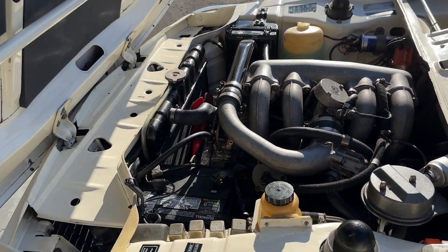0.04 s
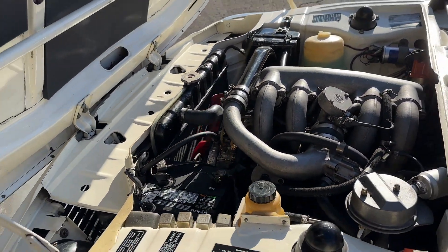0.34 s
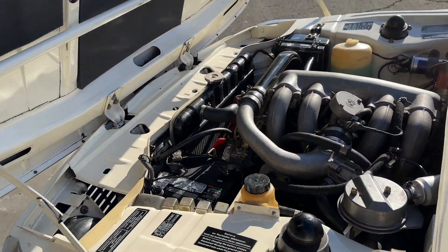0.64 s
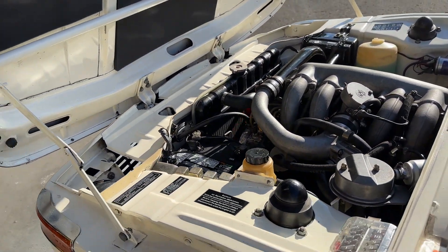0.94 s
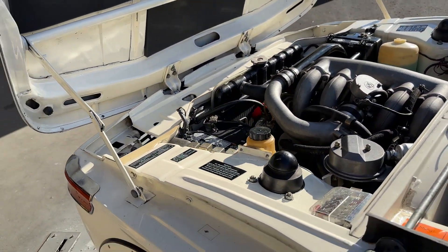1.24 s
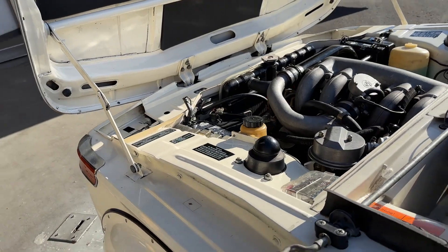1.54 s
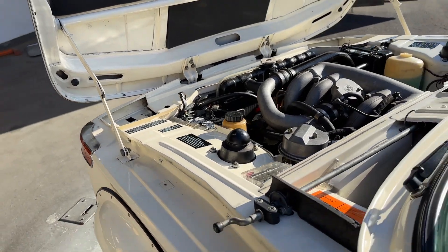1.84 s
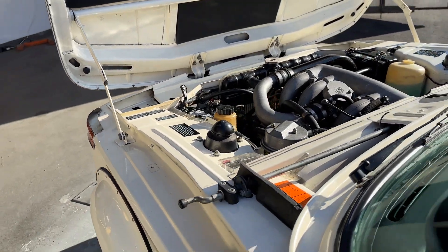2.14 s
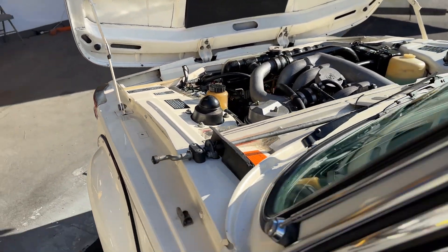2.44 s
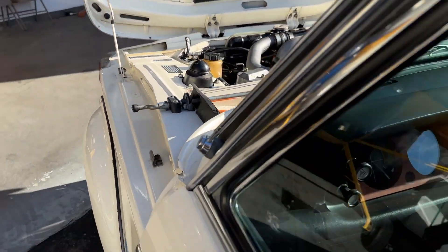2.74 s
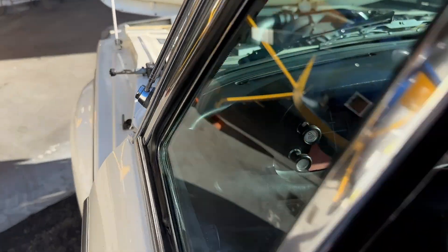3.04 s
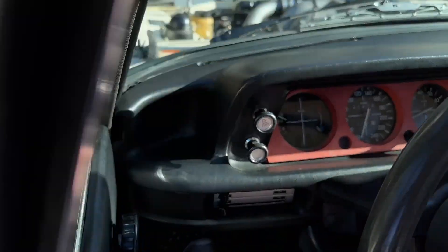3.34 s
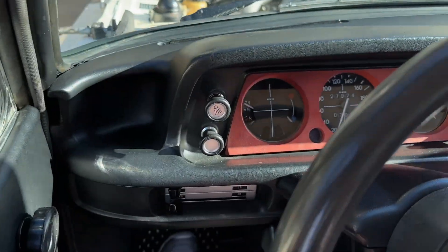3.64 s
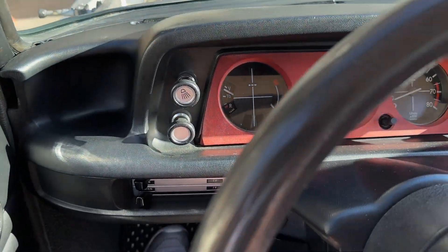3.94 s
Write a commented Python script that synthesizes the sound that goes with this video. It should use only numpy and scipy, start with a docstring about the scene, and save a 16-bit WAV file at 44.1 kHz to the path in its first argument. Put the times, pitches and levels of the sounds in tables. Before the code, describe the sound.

A vintage petrol engine idling with clatter and hiss, turning to a dull boom in the cabin.

```python
"""An old four-cylinder petrol engine idles fast with its bonnet open, its speed wandering a little.
Its firings make the exhaust boom and lope (beat unevenly) and the engine block thrum.
Valves and chain clatter and set metal parts ringing; the fan rushes, the intake hisses, the belt whines.
There is one soft knock and a few faint squeaks. The listener walks from the engine bay into the cabin,
where most of the treble is shut out, a thin sizzle is heard and the boom stays."""
import sys
import numpy as np
from scipy import signal
from scipy.fft import rfft, irfft
from scipy.io import wavfile
from scipy.ndimage import uniform_filter1d, map_coordinates

SR = 44100
rng = np.random.default_rng(int(sys.argv[2]) if len(sys.argv) > 2 else 0)


def transcribe(u):
    """Save the signal u as a 16-bit wav file named by the first command-line argument.

    u: samples, shape (n,) or (channels, n), limited to [-1, 1]; the rate is SR.
    q: integer samples, one column per channel.
    """
    v = np.clip(np.atleast_2d(u).T, -1, 1)
    q = np.round(v * 32767).astype(np.int16)
    wavfile.write(sys.argv[1], SR, q)


N = 176400
TIME_S = np.arange(N) / SR

# How fast the crankshaft spins: time_s, turns_per_s
CRANK_SPEED = [(0.0, 29.4), (0.41, 29.4), (0.52, 30.0), (0.65, 29.8), (0.85, 30.5), (1.0, 30.0),
               (1.31, 31.0), (1.95, 29.3), (2.04, 30.2), (2.17, 30.5), (2.25, 30.2), (2.87, 30.1),
               (3.27, 30.4), (3.49, 29.8), (3.7, 28.8), (4.0, 29.12)]
# The engine bay as heard along the walk: time_s, clatter_db, rush_db, hiss_db, left_minus_right_db
BAY_LEVELS = [(0.0, -32, -36.5, -30.5, 2), (0.57, -31.5, -36.5, -29.5, 2), (1.47, -33.5, -40, -33.5, 1.5),
              (1.77, -34.5, -39.5, -33.5, 2), (2.49, -35.5, -40.5, -34.5, 2),
              (2.63, -36.5, -42.5, -35, 3.5), (2.85, -37, -43.5, -37, 3.5), (3.12, -40.5, -46.5, -41, 9),
              (3.24, -41.5, -47.5, -44.5, 11.5), (3.53, -50, -57, -58.5, 11.5), (3.95, -53.5, -61, -61, 11),
              (4.0, -50, -58, -62, 7)]


def undb(db):
    """Turn decibels into a gain to multiply by."""
    return 10 ** (np.asarray(db) / 20)


def unit(x):
    """Scale a sound so that its average power is 1."""
    return x / np.sqrt(np.mean(x ** 2))


def curve(table, column=1):
    """One column of a time table, filled in for every sample."""
    rows = np.array(table, float)
    return np.interp(TIME_S, rows[:, 0], rows[:, column])


def colour(x, spectrum):
    """Shape bass and treble by rows of pitch_hz, level_db."""
    rows = np.array(spectrum, float)
    hz = np.maximum(np.arange(N // 2 + 1) * SR / N, 1)
    level_db = np.interp(np.log(hz), np.log(rows[:, 0]), rows[:, 1])
    return irfft(rfft(x) * undb(level_db), N)


def resonate(x, hz, width_hz, passes=1):
    """Let a sound ring at one pitch; more passes keep less of the others."""
    for _ in range(passes):
        x = signal.lfilter(*signal.iirpeak(hz, hz / width_hz, fs=SR), x)
    return x


def wander(rate_hz):
    """A smooth random wobble, about 1 in size."""
    hold = int(SR / rate_hz)
    steps = np.repeat(rng.standard_normal(N // hold + 1), hold)
    return unit(uniform_filter1d(uniform_filter1d(steps, hold), hold)[:N])


def per_event(count):
    """A new random value at each whole count, with slopes in between."""
    values = rng.standard_normal(2048)
    return np.interp(count, np.arange(len(values)), values)


def spread(mid, side, pan_db):
    """Make left and right from two similar sounds, widest in the treble."""
    # Stereo width: pitch_hz, side_minus_mid_db
    width = [(60, -4), (200, -11.5), (380, -10.5), (700, -6.5), (1300, -5.5), (2400, -3.5), (4400, -1.5),
             (15000, 3)]
    pair = unit(mid) + colour(unit(side), width) * np.array([[1], [-1]])
    gains = undb(np.array([pan_db, -pan_db]) / 2)
    return pair * gains / np.sqrt(np.mean(gains ** 2, axis=0))


def beside(start_s=0.97, walk_s=0.7):
    """The listener's place: 0 over the engine, 1 beside the car."""
    return np.clip((TIME_S - start_s) / walk_s, 0, 1)


def inside(start_s=3.17, fade_s=0.2):
    """The listener's place: 0 outside, 1 in the cabin."""
    return np.clip((TIME_S - start_s) / fade_s, 0, 1)


def panel_echoes(x, strength=.36, longest_s=.006, count=6):
    """Add short echoes off the bodywork; their strengths change as the listener walks."""
    lags = longest_s * SR * rng.uniform(.1, 1, count)
    drifts = rng.uniform(-2, 2, count)
    progress = np.arange(N) / N
    echoes = sum(np.roll(x, int(lag)) * np.cos(drift * progress) for lag, drift in zip(lags, drifts))
    return x + strength / np.sqrt(count) * echoes


def cabin_sizzle(level_db=-54.5):
    """A thin, high noise heard only in the cabin."""
    # Tone of the sizzle: pitch_hz, level_db
    spectrum = [(2000, -9), (3700, -13), (4080, -3.5), (4350, -12), (4900, -9), (5600, -25), (9000, -38)]
    return unit(colour(rng.standard_normal((2, N)), spectrum)) * inside() * undb(level_db)


def squeaks(waver_hz=45):
    """Belt and fittings squeak: shaky high tones that swell and fade."""
    # The squeaks: peak_s, pitch_hz, length_s, level_db
    events = [(1.72, 4020, .16, -53), (2.21, 3305, .2, -50), (3.91, 5080, .03, -63),
              (3.982, 4900, .03, -60)]
    sound = 0
    for peak_s, hz, length_s, db in events:
        phase = 2 * np.pi * np.cumsum(hz + waver_hz * wander(300)) / SR
        swell = np.exp(-(2 * (TIME_S - peak_s) / length_s) ** 2)
        sound += np.sqrt(2) * np.sin(phase) * swell * undb(db)
    return sound


def knock(start_s=.226, decay_s=.018, gain_db=-30):
    """A panel is knocked softly once and rings briefly."""
    # The panel's tones: pitch_hz, relative_db
    tones = [(262, -3), (322, -1), (410, -5), (505, -7)]
    age_s = np.maximum(TIME_S - start_s, 0)
    ring = sum(undb(db) * np.sin(2 * np.pi * hz * age_s) for hz, db in tones)
    return ring * np.exp(-age_s / decay_s) * undb(gain_db)


def belt_whine(pan_db, waver=.008, roughness=.5):
    """The belt drive sings two slightly rough tones that waver together."""
    # The two tones: pitch_hz, gain_db
    tones = [(922, -1.5), (1336, 0.5)]
    # How they swell and fade: time_s, lower_tone_db, upper_tone_db
    levels = [(0.0, -48, -53), (0.25, -53, -52), (0.36, -41, -44), (0.52, -37.5, -46), (0.65, -38.5, -52),
              (0.85, -37.5, -55), (1.05, -42, -50), (1.2, -52, -53), (1.4, -44, -55), (1.52, -48, -58),
              (1.7, -39.5, -47), (1.95, -42, -46), (2.1, -42, -53), (2.3, -49, -52), (2.52, -46, -53),
              (2.72, -39.5, -50), (2.86, -48, -53), (3.08, -44.5, -52), (3.22, -53, -56), (3.4, -55, -60),
              (3.6, -54.5, -69), (3.75, -61, -78), (4.0, -60, -72)]
    wavering_s = np.cumsum(1 + waver * wander(20)) / SR
    sound = 0
    for column, (hz, db) in enumerate(tones, start=1):
        mid, side = (unit(resonate(x, hz, width_hz=60, passes=2)) for x in rng.standard_normal((2, N)))
        tone = np.sqrt(2) * np.sin(2 * np.pi * hz * wavering_s) + roughness * mid
        sound += spread(tone, side, pan_db) * undb(curve(levels, column) + db)
    return sound


def air_noise(spectrum):
    """The noise of moving air, echoed by the bodywork."""
    return unit(panel_echoes(colour(rng.standard_normal(N), spectrum)))


def fan_rush(turns, pan_db, throb=0.1):
    """The fan makes a wide rush of air that throbs twice a crank turn."""
    # Tone of the rush: pitch_hz, level_db
    spectrum = [(1200, -33), (2300, 0), (3000, 0), (4000, 1), (5500, 0.5), (7200, 1), (8300, -6.5),
                (10000, -41), (16000, -23)]
    rush = spread(air_noise(spectrum), air_noise(spectrum), pan_db)
    return rush * (1 + throb * np.cos(4 * np.pi * turns)) * undb(curve(BAY_LEVELS, column=2))


def intake_hiss(turns, throb=0.1, lag_samples=3.8, all_round_share=.14, gain_db=4):
    """The intake hisses from one spot, reaching the left side later, and throbs once a turn."""
    # Tone of the hiss: pitch_hz, level_db
    spectrum = [(4500, -34), (6300, -13), (7600, -4), (9000, -1.5), (10300, 5.5), (11000, 3.5),
                (11800, -0.5), (13200, 0), (14800, 7), (16000, 1.5)]
    right = air_noise(spectrum)
    delay = np.exp(-2j * np.pi * np.arange(N // 2 + 1) / N * lag_samples)
    left = irfft(rfft(right) * delay, N)
    all_round = np.array([air_noise(spectrum), air_noise(spectrum)])
    hiss = np.sqrt(1 - all_round_share) * np.array([left, right]) + np.sqrt(all_round_share) * all_round
    return hiss * (1 + throb * np.cos(2 * np.pi * turns)) * undb(curve(BAY_LEVELS, column=3) + gain_db)


def valve_taps(turns, decay_s, scatter_db):
    """The loudness of valves snapping shut: four uneven, fading taps a turn."""
    count = 4 * turns
    taps_per_s = count[-1] * SR / N
    age_s = (count % 1) / taps_per_s
    return np.exp(-age_s / decay_s) * undb(scatter_db * per_event(np.floor(count)))


def rattle(turns, repeat_share, tap_share=0.14):
    """Chain and valves grind and tap; part of the noise comes back every two turns."""
    size = int(2 * SR / np.mean(curve(CRANK_SPEED)))
    pattern = rng.standard_normal(size)
    looped = unit(map_coordinates(pattern, [turns / 2 % 1 * size], order=1, mode="grid-wrap"))
    grind = np.sqrt(repeat_share) * looped + np.sqrt(1 - repeat_share) * rng.standard_normal(N)
    taps = unit(valve_taps(turns, decay_s=0.0028, scatter_db=2.5))
    return grind * np.sqrt(1 - tap_share + tap_share * taps ** 2)


def casting_ring(turns, pan_db, gain_db=-1.5):
    """The rattle rings cast metal parts; different ones stand out as the listener moves."""
    # The ringing parts: pitch_hz, width_hz, over_engine_db, beside_car_db
    castings = [(390, 16.5, -29, -9.5), (456, 36, -28, -11.5), (538.3, 11, -21, -15), (600, 17, -11.5, -18),
                (830.7, 12, -9, -14), (992, 12, -10.5, -30), (1034, 11, -15, -15.5), (1335, 22, -15, -14.5)]
    rattles = [rattle(turns, repeat_share=0.34) for _ in range(2)]
    ring = 0
    for hz, width_hz, over_db, beside_db in castings:
        mid, side = (resonate(x, hz, width_hz) for x in rattles)
        ring += spread(mid, side, pan_db) * undb(over_db + beside() * (beside_db - over_db))
    return ring * undb(gain_db)


def cover_rasp(turns, pan_db, gain_db=-12):
    """Thin covers rasp under each valve tap."""
    # Where the covers ring: pitch_hz, width_hz, relative_db
    covers = [(1643, 125, -1.5), (1838, 110, 0.5), (2080, 200, -4.5)]
    strikes = valve_taps(turns, decay_s=0.0033, scatter_db=2) * rng.standard_normal((2, N))
    mid, side = sum(undb(db) * resonate(strikes, hz, width_hz, passes=2) for hz, width_hz, db in covers)
    return spread(mid, side, pan_db) * undb(gain_db)


def valve_gear(turns, pan_db, clatter_gain_db=-1.5, cabin_ring_db=-3):
    """Valves and chain clatter into ringing metal; the car body shuts out the ring a little more."""
    # Tone of the clatter: pitch_hz, level_db
    spectrum = [(130, 5.5), (200, 0), (330, -5.5), (440, 1), (580, -0.5), (700, -3.5), (870, 2),
                (1200, -2.5), (1900, -7), (2300, -8.5), (3000, -23), (5000, -46)]
    mid, side = (colour(rattle(turns, repeat_share=0.17), spectrum) for _ in range(2))
    clatter = spread(mid, side, pan_db) * undb(clatter_gain_db)
    metal = casting_ring(turns, pan_db) + cover_rasp(turns, pan_db)
    return (clatter + metal * undb(cabin_ring_db * inside())) * undb(curve(BAY_LEVELS))


def rumble(gain_db=-39):
    """A loose, deep noise under the firings."""
    # Tone of the rumble: pitch_hz, level_db
    spectrum = [(12, -32), (25, -13), (42, 0), (75, -0.5), (120, -5), (200, -11.5), (350, -24.5),
                (700, -28.5), (2000, -56)]
    mid, side = colour(rng.standard_normal((2, N)), spectrum)
    return spread(mid, side, pan_db=np.ones(N)) * undb(gain_db)


def firing_wave(turns, tones, scatter_db=.8, smear_rad=0.211):
    """Pressure waves in step with the crank; each of the two firings a turn has its own strength."""
    # Pipe and body smear each pulse in time, shifting its tones against each other.
    wave = sum(undb(db) * np.cos(2 * np.pi * per_turn * turns - smear_rad * (per_turn - 2) ** 2)
               for per_turn, db in tones)
    return np.sqrt(2) * wave * undb(scatter_db * per_event(2 * turns))


def engine_firings(turns, shake_lag_turns=.35):
    """Firings make the exhaust boom and the block thrum, hum, shake and buzz; unequal cylinders lope."""
    # The tones in each sound: cycles_per_turn, relative_db
    boom_tones = [(2, 1.5), (2.5, -28)]
    thrum_tones = [(3, 0), (3.5, -22)]
    buzz_tones = [(5, -8), (6, -5), (7, 0), (8, -10), (9, -10)]
    # How each sound swells and fades: time_s, relative_db
    boom_levels = [(0, -30.5), (.12, -27), (.2, -27.5), (.3, -23.7), (.43, -24), (.58, -28), (.72, -26.7),
                   (1.0, -36), (1.09, -31), (1.22, -38), (1.32, -28), (1.41, -24.5), (1.53, -31),
                   (1.64, -27), (1.76, -35), (1.84, -29), (1.94, -39), (2.1, -33), (2.25, -25.5),
                   (2.42, -32), (2.53, -24), (2.77, -22.8), (2.87, -33), (3.05, -23.5), (3.25, -20),
                   (3.38, -20.3), (3.53, -24.5), (3.65, -29), (3.8, -23), (4, -22.8)]
    thrum_levels = [(0, -38), (.2, -36), (.35, -40), (.6, -36), (.85, -33.5), (1.15, -35), (1.38, -32),
                    (1.55, -39), (2.08, -43), (2.22, -36.5), (2.43, -46), (2.52, -40), (2.78, -41),
                    (2.88, -49), (2.97, -39), (3.2, -40), (3.45, -46), (3.55, -41), (4, -40)]
    hum_levels = [(0, -41), (.3, -35.5), (.5, -39), (1.35, -38.5), (1.65, -40), (1.78, -47), (2.2, -41.5),
                  (2.42, -45), (2.55, -40.5), (2.75, -40.5), (2.87, -47), (2.98, -39), (3.5, -42),
                  (3.63, -50), (3.75, -41), (4, -45)]
    shake_levels = [(0, -44), (.25, -48), (.7, -44), (.95, -41), (1.12, -44), (1.4, -37), (1.75, -42.5),
                    (2.0, -48), (2.22, -40), (2.42, -45), (2.7, -38.5), (2.85, -45), (3.05, -38),
                    (3.3, -33.5), (3.57, -37), (3.7, -45), (3.8, -35.5), (4, -38)]
    lope_levels = [(0, -52), (1.2, -50), (2.4, -48), (3.0, -42), (3.35, -34.5), (3.65, -41), (3.9, -34.5),
                   (4, -38)]
    boom = firing_wave(turns, boom_tones, scatter_db=.5) * undb(curve(boom_levels) - 1)
    thrum = firing_wave(turns, thrum_tones) * undb(curve(thrum_levels))
    hum = firing_wave(turns, [(4, 0)]) * undb(curve(hum_levels) + 1.5)  # twice the firing rate
    shake = firing_wave(turns - shake_lag_turns, [(1, 0)]) * undb(curve(shake_levels) + .5)
    lope = firing_wave(turns, [(1.5, 0)]) * undb(curve(lope_levels) - .5)
    buzz = firing_wave(turns, buzz_tones) * undb(-46 - 4 * beside() - 10 * inside())
    return boom + thrum + hum + shake + lope + buzz


def scene():
    """Mix all the sounds; one crankshaft times the firings, the clatter and the throb of the air."""
    turns = np.cumsum(curve(CRANK_SPEED)) / SR
    pan_db = curve(BAY_LEVELS, column=4)
    engine = engine_firings(turns) + rumble() + valve_gear(turns, pan_db) + belt_whine(pan_db)
    flutter = undb(0.75 * wander(rate_hz=25.01))
    air = flutter * (fan_rush(turns, pan_db) + intake_hiss(turns))
    return engine + air + knock() + cabin_sizzle() + squeaks()


def record(dry):
    """Cut the deepest bass and the highest treble."""
    low_hz, top_hz = 20, 15800
    bass_cut = signal.butter(3, low_hz, "highpass", fs=SR, output="sos")
    treble_cut = signal.ellip(10, .2, 80, top_hz, fs=SR, output="sos")
    return signal.sosfilt(treble_cut, signal.sosfilt(bass_cut, dry))


dry = scene()
out = record(dry)
transcribe(out)
```